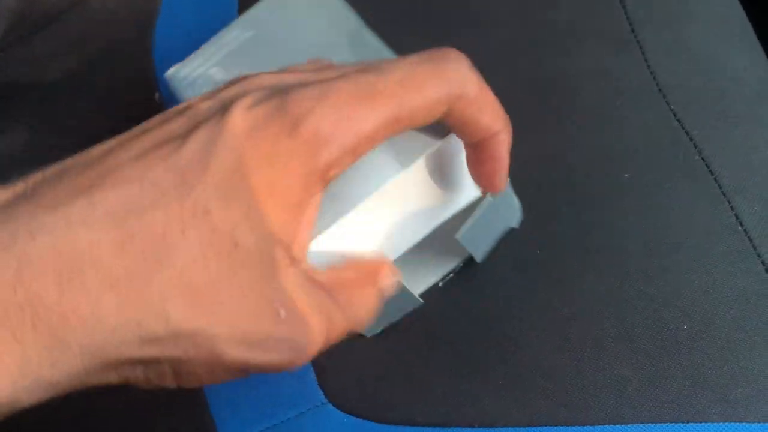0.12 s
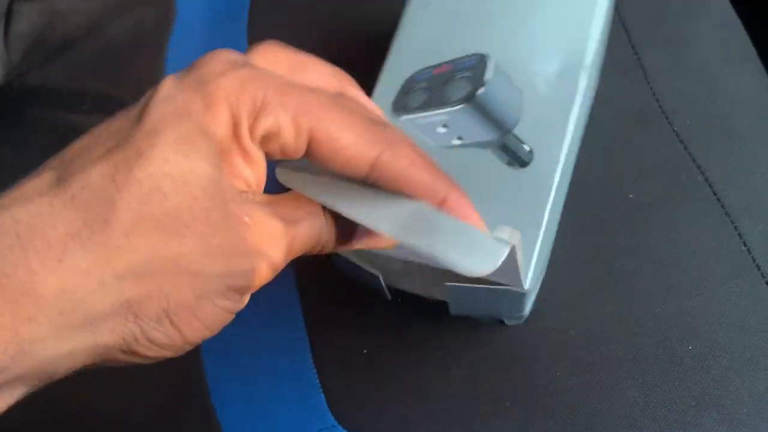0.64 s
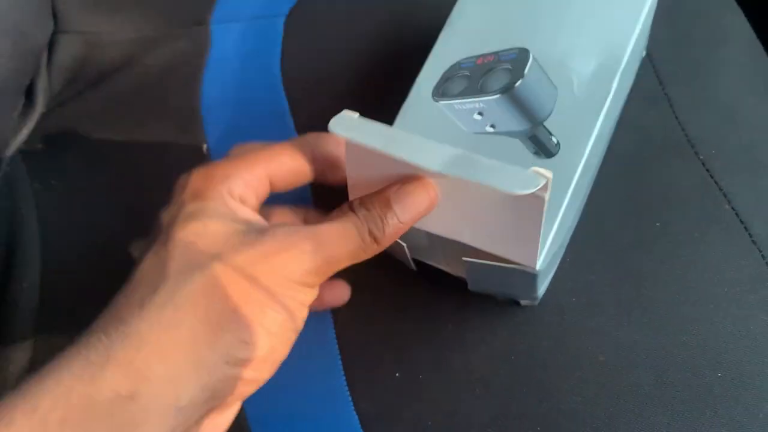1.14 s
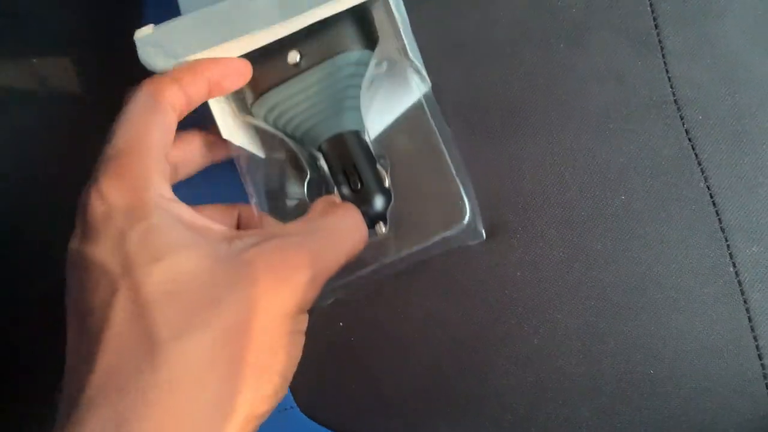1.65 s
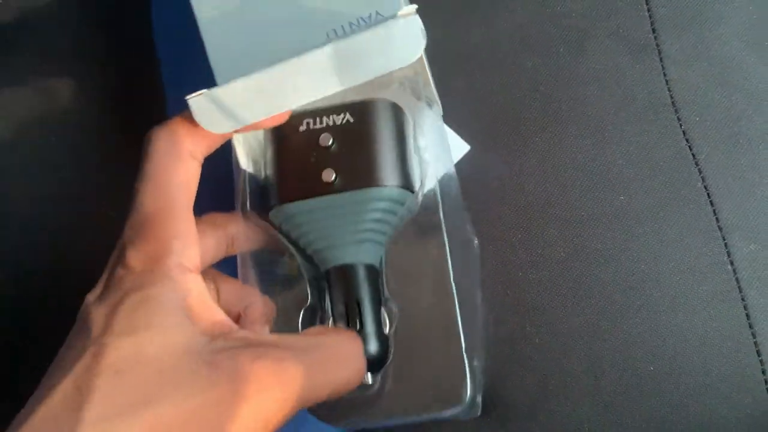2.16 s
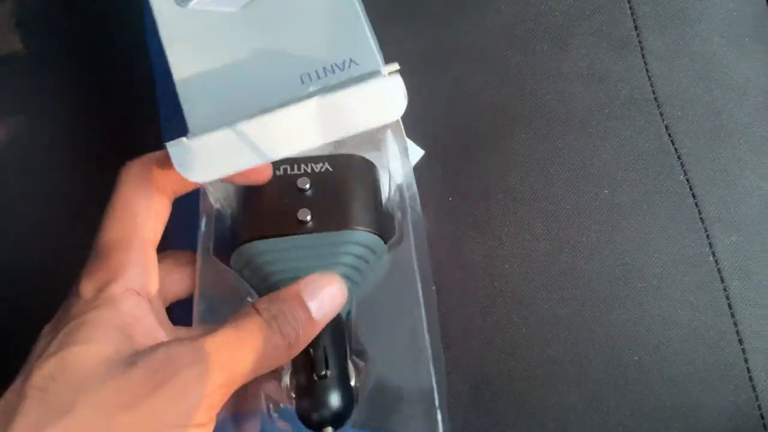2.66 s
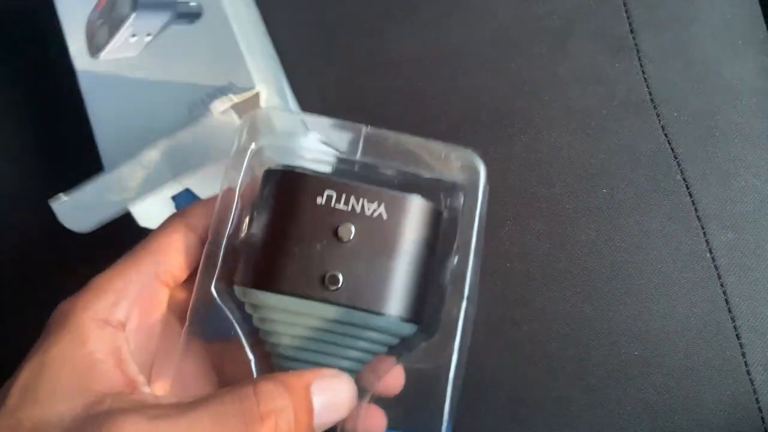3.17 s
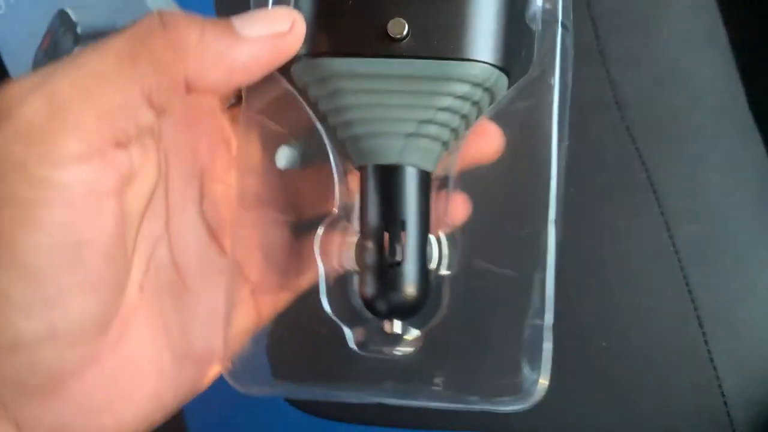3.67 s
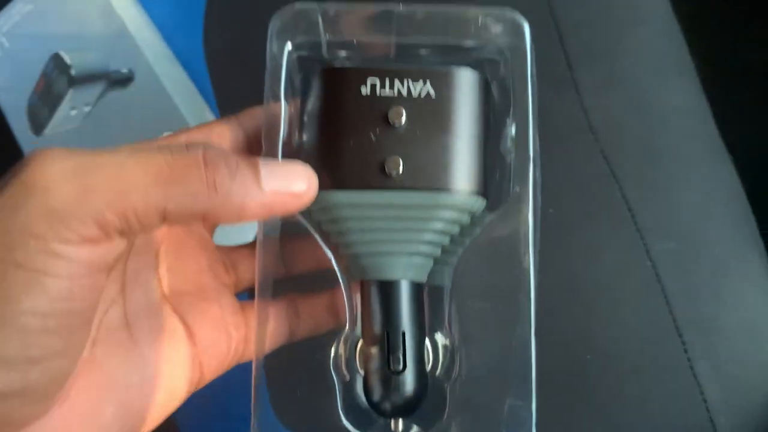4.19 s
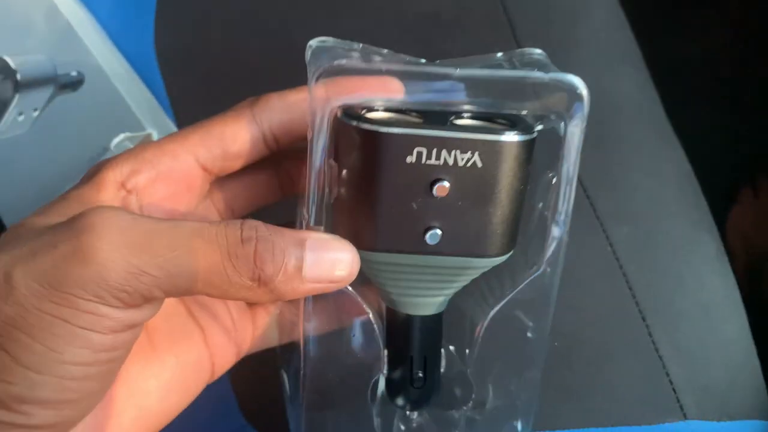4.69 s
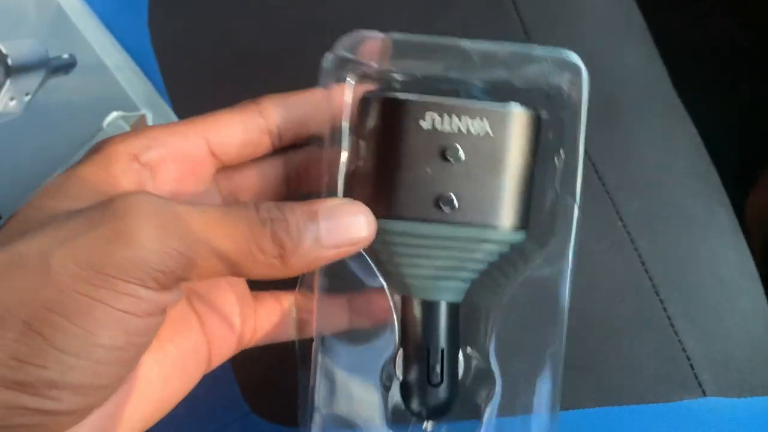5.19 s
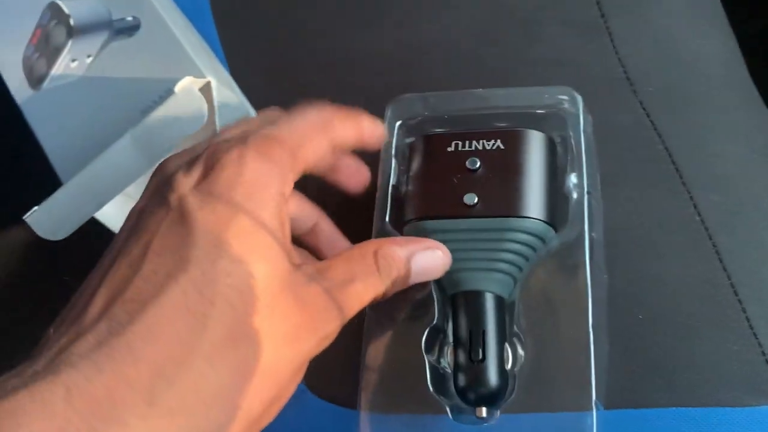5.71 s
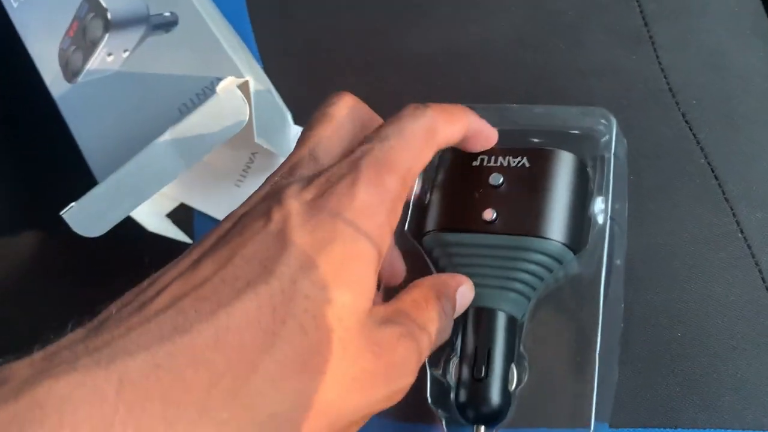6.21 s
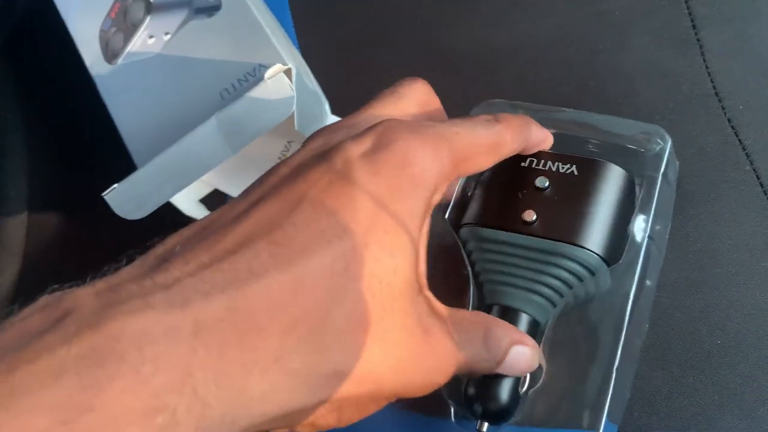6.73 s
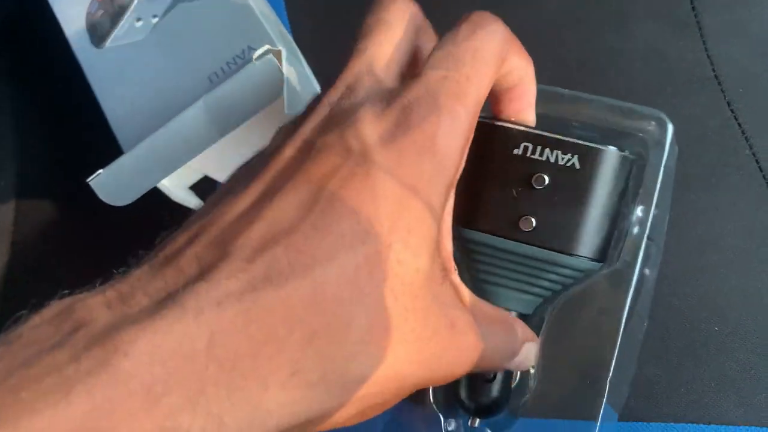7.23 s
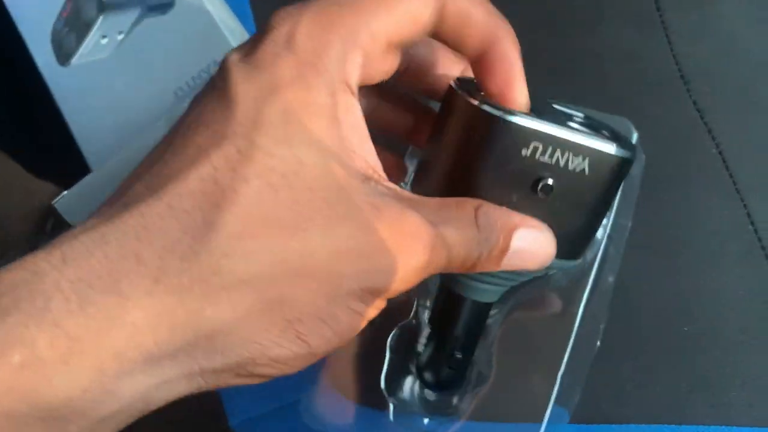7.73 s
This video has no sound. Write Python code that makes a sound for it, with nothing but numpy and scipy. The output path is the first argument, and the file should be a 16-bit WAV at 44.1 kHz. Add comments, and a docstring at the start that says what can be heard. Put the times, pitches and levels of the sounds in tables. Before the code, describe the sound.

Very close to the microphone, fingers rub and tap a small cardboard box, then a thin plastic tray scrapes out with bright snaps and crinkles. Handling grows sparse, with a tiny thin squeak, then sharp clicks and rubbing return as an adapter is pried free, ending around a hard loud snap. The parked car cabin is dry and small, with soft handling rumble and very faint hiss.

```python
"""Hands open a small cardboard box close to the microphone, slide out a thin plastic tray and pry an adapter from it.
Snaps, ticks, scuffs and rubbing are shaped noise that rings the box and tray; a thin squeak is a few tones.
The place is a parked car, whose cabin adds a short tail of sparse echoes.
Behind the hands lie jolts of rumble, slow pressure sways, a faint hiss and, at first, a low hum."""
import sys
import numpy as np
from scipy import signal
from scipy.fft import rfft, irfft
from scipy.io import wavfile
from scipy.ndimage import uniform_filter1d

SR = 44100
rng = np.random.default_rng(int(sys.argv[2]) if len(sys.argv) > 2 else 0)


def volts(x):
    """Linear amplitude factor 10**(x/20) for a level x in dB, scalar or array-like."""
    e = np.asarray(x, float) / 20
    return 10 ** e


def pcm_store(signal):
    """Save signal as 16-bit PCM."""
    levels = np.round(np.clip(np.atleast_2d(signal), -1, 1) * 32767)
    wavfile.write(sys.argv[1], SR, levels.astype(np.int16).T)


N = 346626  # length [samples]
CARD_UNTIL_S = 1.26  # until then fingers rub bare card, later the tray is dragged
HEFT_DULLS = 0.34  # treble lost per heft of a stroke or scuff [dB per dB]


def evened(x):
    """Scales to rms 1."""
    return x / np.sqrt(np.mean(x ** 2) + 1e-20)


def read(points, hz):
    """Reads a table over frequency on a log-frequency axis."""
    f, value = np.transpose(points)
    return np.interp(np.log(hz + 1), np.log(f + 1), value)


def add(mix, s, sound):
    """Mixes a sound in at time s."""
    part = mix[..., round(s * SR):][..., :sound.shape[-1]]
    part += sound[..., :part.shape[-1]]


def coloured(points):
    """Steady noise of a given spectrum, at rms 1."""
    hz = np.fft.rfftfreq(N, 1 / SR)
    return evened(irfft(rfft(rng.standard_normal(N)) * volts(read(points, hz)), N))


# edges of the low, middle and treble parts of a contact: (low [Hz], middle [Hz], treble [Hz])
SPLITS_HZ = (210, 800, 4500)
# taps and snaps close to the microphone:
# (time [s], level [dB], thud [dB re level], treble [dB re level], panel pitch [Hz])
SNAPS = [(0.064, -38, -11, 6.5, 2840), (0.086, -43.5, 5, -5, 620), (0.189, -32, -1.5, -19, 600),
         (0.311, -41, -6, -8, 610), (0.409, -39, -21, -4, 1610), (0.481, -57, 5, 2, 283),
         (0.636, -51.5, 4, -12, 640), (0.9, -43.5, -2, -23, 1390), (0.943, -52.5, -21, 2, 616),
         (1.096, -52, 6.5, -12, 533), (1.143, -44, 6, -40, 577), (1.266, -46.5, -5, -18, 398),
         (1.443, -38.5, -7, -8, 470), (1.475, -20, -40, -29, 1460), (1.528, -38, 2, -2, 1350),
         (1.562, -46, 10, -1, 380), (1.584, -31, -6.5, -3.5, 252), (1.6, -39, -19, 2, 353),
         (1.688, -43, -9, 6, 353), (1.795, -33, 1, -27, 396), (1.808, -25, -3, -0.5, 3050),
         (2.157, -27, -20, -4, 3470), (2.198, -29, -5, -3, 610), (2.259, -32, 0, -5, 1520),
         (2.36, -53, 8, -17, 400), (2.446, -39, -13, -4, 290), (2.549, -41, -7, -2, 2420),
         (2.57, -39.5, 0, 1.5, 2460), (2.628, -50.5, 11, 2, 409), (2.745, -44.5, -7.5, -11, 247),
         (2.763, -33, -14, -0.5, 2490), (2.82, -42, -6.5, -1, 3100), (2.866, -46.5, -22, 6.5, 3170),
         (2.946, -46.5, 3, -11, 270), (3.114, -45, -2, -19, 340), (3.144, -42.5, 2.5, -7.5, 497),
         (3.226, -63, 2, 0, 456), (3.311, -64.5, 26, -9, 450), (3.341, -41.5, -2, -23, 282),
         (3.363, -46, -3, -2, 364), (3.404, -61, -10, -13, 1800), (3.486, -65, -3, -5, 2200),
         (3.543, -31.5, -0.5, -37, 394), (3.562, -28, -30, 0.5, 2950), (3.66, -41, -7, 6.5, 2920),
         (3.754, -46.5, -5, -12, 466), (3.935, -44.5, 3, -11, 493), (4, -44, 2, -10.5, 436),
         (4.073, -47.5, 5, -38, 520), (4.732, -52, 0, -4, 1610), (4.906, -59.5, 23.5, -14, 507),
         (4.963, -63.5, 25, 3, 270), (5.087, -31.5, -15, -25, 610), (5.16, -32, -11, 2, 2640),
         (5.2, -25, -12.5, -19.5, 473), (5.35, -49.5, 3.5, -2, 480), (5.375, -38, 1.5, -36, 648),
         (5.441, -20.5, -6.5, -1.5, 1410), (5.483, -44, -4, -28, 377), (5.628, -47, -2, -3, 1500),
         (5.655, -57, -8, -20, 1500), (5.74, -33.5, -4.5, -25, 477), (5.972, -47, -2, -8, 370),
         (5.993, -35, -2, -12.5, 408), (6.116, -41, -2.5, 0, 557), (6.349, -37, -0.5, -9, 890),
         (6.491, -35, -4, -2, 607), (6.518, -27, -3, -18, 910), (6.627, -27.5, 0, -27, 314),
         (6.653, -31, -1.5, -2.5, 650), (6.731, -28.5, -6, -5.5, 654), (6.745, -40, 4, -26, 438),
         (6.871, -33, -13, -31, 572), (6.929, -38, -32, 4.5, 3350), (6.952, -37, -6, -8, 1440),
         (6.966, -29, -12, -0.5, 3320), (6.991, -22, -9.5, 5, 586), (7.021, -24.5, -9, 14.5, 2580),
         (7.117, -25, -12.5, -27.5, 423), (7.237, -37.5, -5, -20, 895), (7.341, -38, 0, -10, 630),
         (7.36, -24, -15, -7.5, 1210), (7.38, -28.5, -17, 5.5, 604), (7.419, -8.5, -16.5, -7, 1210),
         (7.607, -41.5, 2, -27, 374), (7.756, -43.5, -4.5, -10, 263)]


def snaps(tick_db=-2, burst_db=-4, ring_db=-7, low_longer=2.06, top_shorter=0.62, ring_cycles=4.55):
    """Each snap is a burst of tiny breaks with a tick on top, and one panel answers at its own pitch."""
    drive, ring, t = np.zeros((3, N)), np.zeros(N), np.arange(4000) / SR
    noise = rng.standard_normal((len(SNAPS), 3, len(t)))
    for (s, db, low_db, top_db, hz), (low, mid, top) in zip(SNAPS, noise):
        # a soft contact has little treble, a dull middle, a slower start and a longer decay
        softness = np.clip(-top_db / 25, 0, 1)
        t60 = 0.019 + 0.002 * softness
        start = 1 - np.exp(-t / (0.0012 + 0.0037 * softness ** 2))
        dull = np.exp(-2 * np.pi * 6000 * volts(-16 * softness) / SR)
        mid = evened(signal.lfilter([1], [1, -dull], mid))
        # bass rings on, treble dies first
        low = low * volts(low_db - 60 * t / (low_longer * t60))
        burst = start * volts(-60 * t / (top_shorter * t60))
        tick = volts(tick_db - 60 * t / 0.0017)
        top = top * volts(top_db) * (burst + tick)
        fade = start * volts(-60 * t / t60)
        add(drive, s, volts(db + burst_db) * np.array([start * low, fade * mid, top]))
        # the panel forgets after a few cycles
        keep = np.exp(-hz / ring_cycles / SR)
        resonance = [1, -2 * keep * np.cos(2 * np.pi * hz / SR), keep ** 2]
        panel = signal.lfilter([1], resonance, fade ** 2 * mid)
        loudest_db = db + (low_db if hz < SPLITS_HZ[1] else 0)
        add(ring, s, volts(loudest_db + ring_db) * panel / abs(panel).max())
    return body(drive) + ring


# thin ticks of plastic edges: (time [s], level [dB])
TICKS = [(0.514, -51), (0.694, -61), (1.477, -56), (1.4944, -41), (1.512, -45), (1.5404, -45),
         (1.5547, -42), (1.6174, -45), (1.6362, -42), (1.7095, -38), (1.737, -40), (1.7494, -49),
         (1.7784, -37), (2.0453, -30.5), (2.1748, -43), (3.618, -62), (5.3348, -54), (5.5039, -64),
         (5.535, -44), (6.134, -47), (6.287, -43), (6.31, -46), (6.36, -38), (6.385, -46), (6.422, -43.5),
         (6.847, -62), (6.9445, -44), (7.6162, -52.5)]


def ticks(t60=0.0047):
    """Thin plastic edges catch and let go: treble only, gone in a few ms."""
    drive, t = np.zeros((3, N)), np.arange(1500) / SR
    noise = rng.standard_normal((len(TICKS), len(t)))
    for (s, db), breaks in zip(TICKS, noise):
        add(drive[2], s, breaks * volts(db - 60 * t / t60))
    return body(drive)


# short scuffs: (time [s], level [dB], heft: low part [dB re level], t60 [s])
SCUFFS = [(0.116, -53.5, -8, 0.11), (0.77, -42.5, 2, 0.052), (1.707, -40.5, 3, 0.047),
          (1.848, -29.5, -5.5, 0.4), (1.975, -31, -14, 0.038), (2.044, -40, 2, 0.11),
          (2.104, -30.5, -1.5, 0.054), (2.242, -24, -6.5, 0.061), (2.772, -45, -5, 0.091),
          (2.868, -49, -20, 0.022), (2.963, -29, -6.5, 0.05), (3.035, -52, 2, 0.053),
          (3.545, -41, -2, 0.094), (3.646, -44.5, -7, 0.078), (3.822, -41, 0.5, 0.18),
          (5.121, -39.5, -5.5, 0.13), (5.243, -48, -13, 0.094), (5.531, -33, -2, 0.069),
          (5.552, -28, 5.5, 0.094), (6.118, -41.5, -5, 0.2), (6.153, -40, 1, 0.036),
          (6.272, -42.5, 0, 0.16), (6.354, -39, -0.5, 0.083), (6.489, -34.5, -6, 0.22),
          (6.699, -38.5, -5, 0.065), (6.966, -35.5, -4, 0.18), (7.231, -38.5, 1, 0.076),
          (7.33, -39.5, 5.5, 0.044), (7.444, -37, -4.5, 0.083), (7.521, -35.5, -0.5, 0.056)]


def scuffs(swell_s=0.015, treble_db=-10):
    """Short strokes: a cluster of grains swells, then dies."""
    pressure, t = np.zeros((3, N)), np.arange(8000) / SR
    for s, db, low_db, t60 in SCUFFS:
        swell = np.sin(np.pi / 2 * t / swell_s) ** 2
        shape = np.where(t < swell_s, swell, volts(-60 * (t - swell_s) / t60))
        parts_db = np.array([[low_db], [0], [treble_db - HEFT_DULLS * low_db]])
        add(pressure, s, volts(db + parts_db) * shape)
    grains = friction(slips_per_s=640, spread_db=4.0, smooth=0.65, flutter_db=0.0)
    drive = volts(-10.5) * pressure * grains
    return body(drive) + volts(-6) * rasp(drive[1])


# rubbing and sliding strokes:
# (start [s], length [s], start level [dB], end level [dB], heft: low part [dB re level])
STROKES = [(0.036, 0.22, -70, -62.5, 3), (0.263, 0.41, -66, -77, 1.5), (0.629, 0.16, -71.5, -62.5, 4),
           (0.812, 0.096, -76, -70.5, 8), (0.941, .08, -69, -80, 7), (1.021, 0.064, -75, -70, 4.5),
           (1.102, 0.13, -76, -74.5, 7), (1.255, 0.21, -68, -63.5, 2.5), (1.454, 0.31, -62.5, -54.5, -2.5),
           (1.786, 0.22, -46.5, -50, -3), (1.99, 0.15, -47, -57, -4.5), (2.102, 0.18, -61, -51, 2.5),
           (2.299, 0.34, -71, -63.5, 2.5), (2.61, 0.29, -66, -78, 3.5), (2.984, 0.28, -63, -91.5, 10),
           (3.693, 0.047, -75, -77, 14), (3.742, 0.111, -89, -66, 12), (3.863, 0.22, -68, -92, 12),
           (4.637, 0.31, -84.5, -82.5, 11), (5.112, 0.18, -70, -80.5, 17), (5.308, 0.14, -78.5, -55.5, 4),
           (5.44, 0.25, -60, -76.5, 3.5), (5.928, .16, -74, -65, -2.5), (6.115, 0.2114, -72, -58.5, -3),
           (6.342, 0.2, -71, -58.5, 1.5), (6.536, 0.075, -54, -67, 5), (6.634, 0.082, -55, -63, 11),
           (6.803, 0.33, -80.5, -73, 8), (7.113, 0.1, -66, -62, 5.5), (7.211, 0.071, -61, -58, 2),
           (7.3, 0.1, -63, -59.5, 2), (7.425, 0.16, -61.5, -60, 2), (7.593, 0.13, -66, -74, 5.5),
           (7.751, 0.13, -62.5, -54, 2)]


def rubbing(edge_s=0.0066, treble_db=-5, card_treble_db=5.5, crackle_db=-3):
    """Fingers and tray slide along the card in strokes that start and stop; bare card hisses brighter."""
    pressure = np.zeros((3, N))
    for s, length, start_db, end_db, heft_db in STROKES:
        t = np.arange(0, length + edge_s, 1 / SR)
        edges = np.clip(np.minimum(t, t[-1] - t) / edge_s, 0, 1)
        shape = edges * volts(start_db + (end_db - start_db) * t / length)
        top_db = treble_db - HEFT_DULLS * heft_db + card_treble_db * (s < CARD_UNTIL_S)
        add(pressure, s, shape * volts([[heft_db], [0], [top_db]]))
    drive = pressure * friction(slips_per_s=700, spread_db=1.0, smooth=1.3, flutter_db=3.1)
    return body(drive) + rasp(drive[1]) + volts(crackle_db) * pressure[1] * crackle()


def friction(slips_per_s, spread_db, smooth, flutter_db):
    """Stick and slip: many small ticks of uneven size over a smooth hiss, each part fluttering on its own."""
    size = volts(spread_db * np.minimum(rng.exponential(1, N), 4)) * (rng.random(N) < slips_per_s / SR)
    slips = signal.lfilter([1], [1, -np.exp(-1 / (0.0026 * SR))], size)  # each tick dies in a few ms
    wander = uniform_filter1d(uniform_filter1d(rng.standard_normal((3, N)), 600), 600)
    flutter = volts(flutter_db * evened(wander))
    return evened((smooth + evened(slips)) * flutter * rng.standard_normal((3, N)))


def crackle(per_s=150, spread_db=3.5, cycles=6.1, count=16):
    """Small creases give way at random, each with a short pitch of its own."""
    size = volts(spread_db * np.minimum(rng.exponential(1, N), 4)) * (rng.random(N) < per_s / SR)
    crease, t, out = rng.integers(0, count, N), np.arange(1500) / SR, np.zeros(N)
    for k, hz in enumerate(np.geomspace(550, 3800, count)):
        shape = np.sqrt(hz) * (1 - np.exp(-t / 0.0011)) * np.exp(-t * hz / cycles)
        grain = shape * np.sin(2 * np.pi * hz * t)
        out += signal.oaconvolve(size * (crease == k), grain)[:N]
    return evened(out)


# what the tray's rim adds while it is dragged: (frequency [Hz], width [Hz], level [dB re stroke])
RASP = [(1350, 75, -15.5), (2950, 1000, -6.5)]


def rasp(drive):
    """The dragged rim of the tray answers the friction in two bands, once the bare card is done with."""
    out = np.zeros(N)
    for hz, width, db in RASP:
        b, a = signal.iirpeak(hz, hz / width, SR)
        evening = np.sqrt(SR / (np.pi * width))  # a narrow band passes less noise
        out += volts(db) * evening * signal.lfilter(b, a, drive)
    return out * (np.arange(N) > CARD_UNTIL_S * SR)


def squeak():
    """A few narrow, slightly shaky tones for an instant."""
    out, t = np.zeros(N), np.arange(round(0.025 * SR)) / SR
    tones = [(3200, -61.5), (8800, -52), (9500, -64)]  # (frequency [Hz], level [dB])
    shake = 1 + 0.28 * np.sin(2 * np.pi * 250 * t)
    shape = np.minimum(t / 0.005, 1) * np.exp(-t / 0.0071) * shake
    add(out, 4.366, shape * sum(volts(db) * np.sin(2 * np.pi * hz * t) for hz, db in tones))
    return out


# what box and tray ring with: (frequency [Hz], width [Hz], relative level [dB])
BODY = [(270, 60, -7.5), (420, 210, 15.5), (610, 47, 16.5), (1004, 66, 7), (1210, 53, 4), (1374, 260, 9.5),
        (1587, 43, 9.5), (2253, 120, 9), (2516, 164, 9.5), (2822, 61, 7), (3180, 440, 7), (4760, 90, -33),
        (5750, 490, 3), (6940, 240, -10), (8440, 340, 5), (11200, 110, -4.5)]
# broad colour under the rings: (frequency [Hz], relative level [dB])
SHELL = [(150, 9.5), (300, 16), (1900, -3), (4000, 3.5), (6500, 7), (10000, 5), (12500, -6), (15500, -28.5),
         (16600, -70)]


def body(drive):
    """Low, middle and treble drives each ring their share of the box and tray, causally."""
    hz = np.fft.rfftfreq(4096, 1 / SR)
    rings = sum(volts(2 * db) / (1 + (2 * (hz - f) / width) ** 2) for f, width, db in BODY)
    gain = np.sqrt(rings + volts(2 * read(SHELL, hz)))
    low, mid, top = (1 / np.sqrt(1 + (edge / (hz + 1)) ** 10) for edge in SPLITS_HZ)
    shares = np.sqrt(1 - mid ** 2) * low, mid * np.sqrt(1 - top ** 2), top
    out = np.zeros(N)
    for x, share in zip(drive, shares):
        # minimum phase: the response starts at once and nothing sounds ahead of the contact
        log_gain = np.log(np.maximum(gain * share, 1e-5))
        circle = np.concatenate([log_gain, log_gain[-2:0:-1]])
        taps = np.fft.ifft(np.exp(np.conj(signal.hilbert(circle)))).real[:2048]
        out += signal.oaconvolve(x, taps / np.linalg.norm(taps))[:N]
    return out


# how long the cabin rings: (frequency [Hz], t60 [s])
CABIN = [(300, 0.092), (1500, 0.076), (5000, 0.049), (12000, 0.047)]


def cabin(x):
    """Sparse echoes of random sign from glass and seats, each band dying at its own speed."""
    taps = np.zeros(SR // 4)
    at = np.arange(80, len(taps) - 20, 20)
    taps[at + rng.integers(0, 20, len(at))] = rng.choice([-1., 1.], len(at))
    hz, t, z = signal.stft(taps, SR, nperseg=128)
    decay = volts(-60 * t / read(CABIN, hz)[:, None])
    tail = signal.istft(z * decay, SR, nperseg=128)[1]
    return signal.oaconvolve(x, tail / np.linalg.norm(tail))[:N]


# jolts of handling that reach the microphone as rumble: (time [s], level [dB])
JOLTS = [(0.02, -53.5), (1.26, -60), (1.6, -51), (1.84, -51), (2.25, -52), (3.22, -70), (3.55, -54),
         (3.98, -59), (4.33, -55), (5.0, -71), (5.21, -53.5), (5.6, -49.5), (6.0, -53.5), (6.5, -52.5),
         (6.7, -54), (6.96, -66), (7.49, -52.5), (7.84, -62)]
# colour of the rumble: (frequency [Hz], relative level [dB per Hz])
RUMBLE_COLOUR = [(12, -39.5), (25, -8), (50, -6.5), (100, -16), (250, -65)]


def rumble(floor_db=-68, rise_db_per_s=194, fall_db_per_s=149):
    """Each jolt swells and sinks again to the resting rumble."""
    power, t = np.full(N, volts(2 * floor_db)), np.arange(N) / SR
    for s, db in JOLTS:
        below_db = np.maximum((s - t) * rise_db_per_s, (t - s) * fall_db_per_s)
        power += volts(2 * (db - below_db))
    return np.sqrt(power) * coloured(RUMBLE_COLOUR)


# colour of the pressure sways: (frequency [Hz], relative level [dB per Hz])
SWAY_COLOUR = [(2, -24), (8, 9), (20, -11), (35, -15), (100, -72)]


def sways(rms_db=-52):
    """Slow pressure sways in the closed cabin, as steady noise of very low pitch."""
    return volts(rms_db) * coloured(SWAY_COLOUR)


def hum(hz=103, rms_db=-63.5, start_s=0.16, end_s=1.17):
    """One soft low tone that comes and goes."""
    t = np.arange(N) / SR
    on = np.clip(np.minimum(t - start_s, end_s - t) / 0.029, 0, 1)
    return np.sqrt(2) * on * volts(rms_db) * np.sin(2 * np.pi * hz * t)


# colour of the faint hiss: (frequency [Hz], relative level [dB per Hz])
HISS = [(50, -42.5), (90, 3.5), (150, -1), (283, -4), (767, -14), (1240, -16), (3000, -23.5), (8000, -27),
        (11800, -30), (12300, -54), (16000, -73.5)]


def hiss(rms_db=-68.5):
    """Faint steady noise behind everything, strongest in the bass."""
    return volts(rms_db) * coloured(HISS)


def scene():
    """Hands and packaging in the cabin, over its quiet background."""
    hands = snaps() + ticks() + scuffs() + rubbing() + squeak()
    background = rumble() + sways() + hum() + hiss()
    return (hands + volts(-8.5) * cabin(hands) + background)[None]


def roll_off(x):
    """The treble ends steeply here."""
    return signal.sosfilt(signal.butter(12, 16500, fs=SR, output="sos"), x)


def record(dry):
    """The microphone's mix, with the band ending at 16 kHz."""
    limited = signal.oaconvolve(dry, signal.firwin(255, 16000, fs=SR)[None], "same")
    return roll_off(limited)


dry = scene()
out = record(dry)
pcm_store(out)
```